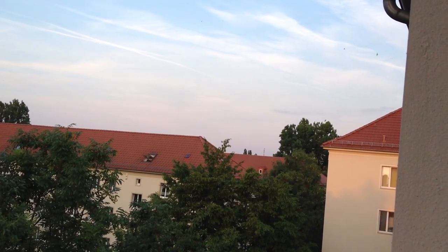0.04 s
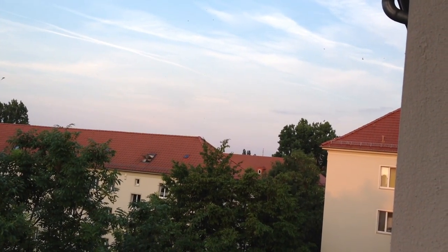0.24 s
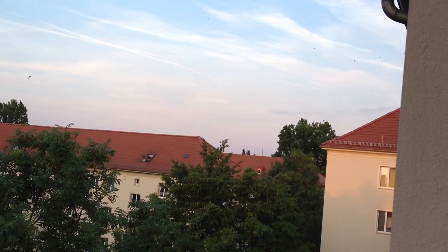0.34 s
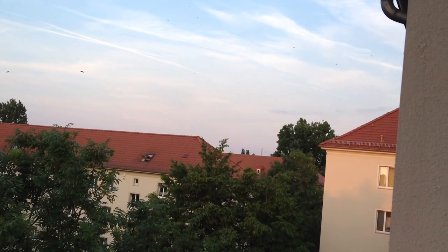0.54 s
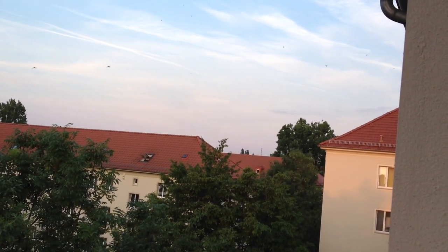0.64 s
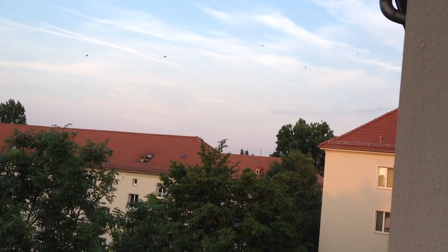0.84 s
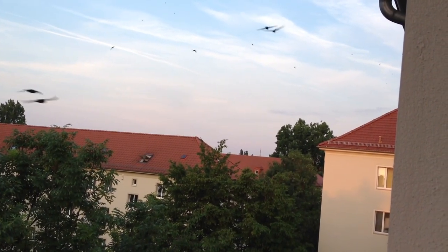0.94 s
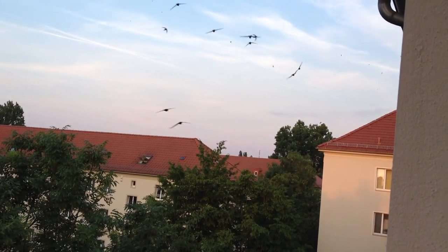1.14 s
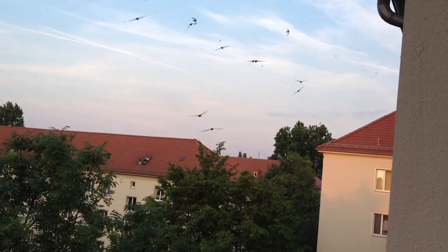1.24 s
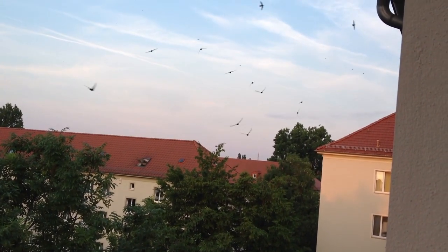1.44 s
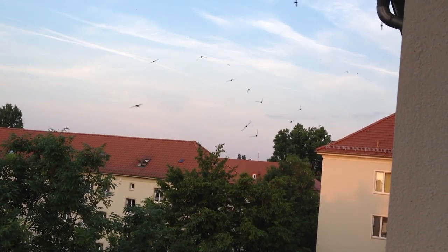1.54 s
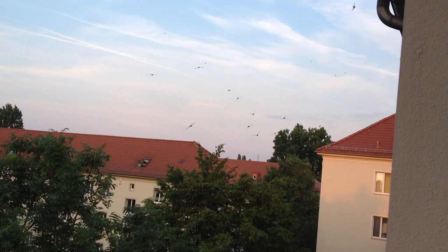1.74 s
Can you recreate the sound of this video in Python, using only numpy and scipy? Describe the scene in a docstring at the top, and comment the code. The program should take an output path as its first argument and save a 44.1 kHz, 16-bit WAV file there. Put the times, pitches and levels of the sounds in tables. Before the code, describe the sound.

Shrill overlapping screams and trills of swifts flying past between houses, then growing fainter.

```python
"""A courtyard between houses at dusk, with a party of swifts screaming overhead.
Each scream is a shrill whistle that swoops up and levels off, modulated in amplitude and frequency
about 250 times a second, which is heard as a buzz. It may end in a falling trill of chips.
Farther birds blur into a rough band, the walls reverberate, and the town hums faintly below."""
import sys
import numpy as np
from scipy import signal
from scipy.fft import rfft, irfft
from scipy.io import wavfile
from scipy.ndimage import uniform_filter1d

SR = 44100
rng = np.random.default_rng(int(sys.argv[2]) if len(sys.argv) > 2 else 0)


def store_pcm(level_fs):
    """Save levels as 16-bit WAV."""
    pcm = np.round(np.clip(level_fs, -1, 1) * 32767).astype(np.int16)
    wavfile.write(sys.argv[1], SR, np.atleast_2d(pcm).T)


N = 79380

# One contour per scream. Each row: time in seconds, pitch in Hz, level in dB.
SCREAM_CONTOURS = [
    [(0.17, 4946, -35), (0.19, 5415, -35), (0.21, 5887, -30.5), (0.268, 6010, -28), (0.286, 6060, -20),
     (0.316, 6100, -26.5), (0.325, 6204, -14.5), (.345, 6180, -25.5), (.37, 6287, -17.5), (.388, 6265, -23),
     (.413, 6340, -19), (0.452, 6400, -22), (0.514, 6310, -22), (0.62, 6115, -30)],
    [(.478, 5530, -53), (.49, 5827, -30), (.513, 6462, -29), (.53, 6910, -15), (.545, 7090, -21.5),
     (.58, 7074, -16.5), (.611, 7180, -13), (.645, 7285, -19.5), (.675, 7150, -15.5), (.72, 7160, -32),
     (.76, 6400, -61)],
    [(0.51, 5123, -21.5), (0.52, 5443, -28), (0.55, 6208, -15), (0.58, 6483, -20), (0.62, 6595, -16),
     (0.682, 6500, -25.5), (0.692, 6356, -23.5), (0.746, 6170, -26.5), (0.8, 5870, -61)],
    [(.727, 4382, -57), (.737, 4800, -31.5), (.752, 5335, -30), (.771, 5704, -19.5), (.8, 5870, -16.5),
     (.84, 5994, -20), (.875, 6100, -24), (.897, 6210, -28), (.915, 6200, -20.5), (.96, 6278, -33),
     (1.0, 6255, -37), (1.1, 6440, -43.5)],
    [(.87, 5580, -36), (.92, 5630, -41), (.97, 5354, -37), (1.0, 5350, -52), (1.085, 5800, -41),
     (1.12, 5050, -40.5), (1.165, 4936, -48)],
    [(1.122, 5100, -40), (1.15, 5363, -37.5), (1.2, 5630, -39), (1.24, 5730, -34.5), (1.28, 5760, -40),
     (1.33, 5860, -39)],
    [(1.25, 5218, -59), (1.272, 5364, -35.5), (1.314, 5740, -37), (1.39, 5926, -34.5), (1.5, 5944, -51)],
    [(1.465, 4310, -38.5), (1.478, 4510, -40.5), (1.5, 4890, -42), (1.522, 5210, -29), (1.54, 5430, -45),
     (1.575, 5596, -39.5), (1.64, 5700, -42), (1.7, 5770, -47)],
    [(1.52, 5470, -61), (1.55, 5870, -36), (1.606, 6077, -39), (1.8, 6155, -58)],
]
# One voice per scream. Each row: buzz rate in Hz, buzz depth from 0 to 1, pitch swing in Hz,
# gain of the side partials in dB, hoarseness as a factor.
SWIFT_VOICES = [(244, 0.38, 20, 6, 0.84), (257.8, 0.7, 6, 1.5, 0.5), (240.5, 0.6, 24, 4, 0.32),
                (259.4, 0.49, -120, 3.5, 0.44), (260, 0.46, 29, 0, 1), (244.6, 0.78, -50, 7.5, 0.58),
                (242, 0.3, -48, -0.8, 0.57), (247, 0.47, 34, -9, 1.5), (243, 0.5, -42, 2.8, 0.86)]


def near_swifts(fade_s=0.005):
    """Superposition: overlapping screams add, each gliding along its own pitch and level contour."""
    out = np.zeros(N)
    for contour, voice in zip(SCREAM_CONTOURS, SWIFT_VOICES):
        times, hz, db = np.transpose(contour)
        t = np.arange(times[0], times[-1] + fade_s, 1 / SR)
        fade = np.clip(np.minimum(t - times[0], t[-1] - t) / fade_s, 0, 1)
        whistle = scream(np.interp(t, times, hz), *voice)
        add(out, times[0], whistle * amp(np.interp(t, times, db)) * fade)
    return out


def scream(hz, buzz_hz, depth, swing_hz, side_db, hoarseness, jitter_rad=0.25):
    """Amplitude and frequency modulation: the buzz puts sidebands around a whistle."""
    n = len(hz)
    buzz_rate = buzz_hz * (1 + 0.03 * drift(n, rate_hz=10.5))
    buzz = np.cos(2 * np.pi * (np.cumsum(buzz_rate) / SR + rng.random()))
    waver_hz = 22 * drift(n, rate_hz=20.55)
    whistle = harmonics(hz + swing_hz * buzz + waver_hz, jitter_rad, side_db, hoarseness)
    flutter_db = 2.2 * drift(n, rate_hz=26.5)
    return whistle * (1 + depth * buzz) * amp(flutter_db)


# A swift's spectrum. Each row: multiple of the pitch, relative level in dB, weight of the rasp.
SWIFT_PARTIALS = [(.5, -45, .4), (1, 0, 0), (1.5, -22.5, 2.6), (2, -13, 1.15)]


def harmonics(hz, jitter_rad, side_db=0, hoarseness=0.32, partials=SWIFT_PARTIALS):
    """Random phase modulation broadens each partial of the voice, so the tone sounds hoarse."""
    phase = 2 * np.pi * np.cumsum(hz) / SR + jitter_rad * drift(len(hz), rate_hz=200)
    rasp = hoarseness * drift(len(hz), rate_hz=400)
    tone = np.zeros(len(hz))
    for multiple, db, rasp_weight in partials:
        top_rolloff_db = 11 * np.maximum(multiple * hz - 13300, 0) / 1e3  # overtones fade above 13.3 kHz
        peak = np.sqrt(2) * amp(db + side_db * (multiple != 1) - top_rolloff_db)
        tone += peak * np.sin(multiple * phase + rasp_weight * rasp)
    return tone


# Each row: chip length in seconds, fall within a chip in Hz, phase jitter in radians, gain of the side
# partials in dB, chips. Each chip: middle time in seconds, level in dB, middle pitch in Hz.
TRILL_RUNS = [ (0.0095, 340, 0.38, 0.9, [(0.054, -28.5, 6220), (.077, -27.5, 6020), (.098, -27, 5920),
              (.12, -26, 5770), (.143, -28, 5510), (.166, -26.5, 5580), (.188, -32, 4970),
              (.21, -41.5, 4120)]), (0.015, 1070, 1.4, -6, [(.228, -42, 4800), (.242, -35.5, 4740),
              (.33, -31.5, 5290), (.345, -38.5, 4950)]), (.008, 840, 1.13, 10, [(.604, -38, 4580),
              (.618, -28, 4950), (.634, -29.5, 4770), (.651, -26, 4650), (.668, -25, 4650),
              (.686, -30.5, 4340), (.702, -32, 4330), (.72, -35, 4200), (.738, -35, 4160)]),
              (0.013, 200, 0.67, 13.5, [(.643, -21, 5660), (.668, -28, 5470), (.697, -29.5, 5520),
              (.726, -27.5, 5250)]), (.008, 380, 0.21, 8.5, [(.791, -21, 6560), (.804, -28, 6600),
              (.816, -31, 6350), (.829, -28, 6270), (.842, -42, 6200)]),
              (0.0062, 170, 0.071, 0.5, [(1.011, -28, 5467), (1.024, -32, 5470), (1.037, -44, 5603),
              (1.05, -21, 5930), (1.063, -26, 5600), (1.076, -24, 5760), (1.089, -27, 5480)]),
              (0.011, 590, 0.96, -3, [(1.163, -41.5, 4740), (1.178, -47, 4420), (1.19, -41.5, 4740)]),
              (0.0073, 650, 1, 10, [(1.459, -47, 4140), (1.494, -49, 4202), (1.511, -44, 4300),
              (1.529, -46, 4033), (1.547, -48, 4080), (1.567, -47, 4100)]),
              (0.0072, 360, 0.35, -10, [(1.698, -37, 5580), (1.721, -39, 5400), (1.745, -40, 5200),
              (1.771, -43, 4980), (1.795, -50, 4480)]), ]


def trills():
    """Pulse trains: short falling chips in quick succession are heard as a trill."""
    out = np.zeros(N)
    for length_s, fall_hz, jitter_rad, side_db, chips in TRILL_RUNS:
        for middle_s, db, hz in chips:
            note = chip(length_s, hz + fall_hz / 2, hz - fall_hz / 2, db, jitter_rad, side_db=side_db)
            add(out, middle_s - length_s / 2, note)
    return out


def chip(length_s, start_hz, end_hz, db, jitter_rad, **timbre):
    """A linear frequency sweep under a smooth envelope makes one short note."""
    progress = np.arange(0, 1, 1 / (length_s * SR))
    envelope = amp(db) * np.sin(np.pi * progress ** 0.8) ** 2
    return envelope * harmonics(start_hz + (end_hz - start_hz) * progress, jitter_rad, **timbre)


# Each row: start and length in seconds, nominal start and end pitch in Hz, level in dB,
# phase jitter in radians.
FAINT_NOTES = [(0.135, 0.0427, 2570, 1895, -45.5, 1), (0.886, 0.059, 3100, 3155, -49.5, 0.24),
               (1.238, 0.0294, 3620, 4460, -51, 0.41)]


def faint_notes():
    """Single swept partials: two gliding chirps and a swift scream's undertone an octave below."""
    out = np.zeros(N)
    for start_s, *note in FAINT_NOTES:
        add(out, start_s, chip(*note, partials=[(0.98, 0, 0.0069)]))
    return out


# The distant swifts together. Each row: time in seconds, middle pitch in Hz, level in dB.
FLOCK_CONTOUR = [(0, 6506, -27), (0.132, 6417, -29.5), (0.222, 6150, -37.5), (.45, 6228, -20.5),
                 (0.681, 6750, -19), (.8, 6334, -25.5), (.95, 5974, -29), (1.1, 6196, -31),
                 (1.2, 6226, -42), (1.3, 5900, -41), (1.501, 5872, -38.5), (1.648, 6037, -37.5),
                 (1.8, 6000, -41)]


def far_flock(spread_hz=230):
    """Incoherent addition: four rough voices, each swelling and fading, merge into a band."""
    times, hz, db = np.transpose(FLOCK_CONTOUR)
    t = np.arange(N) / SR
    flock = np.zeros(N)
    for offset in np.linspace(-1, 1, 4):
        pitch = np.interp(t, times, hz) + spread_hz * (offset + 0.4 * drift(N, rate_hz=3.6))
        voice = scream(pitch, buzz_hz=245, depth=0.93, swing_hz=57,
                       side_db=-2, hoarseness=1.4, jitter_rad=0.4)
        flock += voice * amp(1.8 * drift(N, rate_hz=34))
    return unit_rms(flock) * amp(np.interp(t, times, db))


def wall_reverberation(sound, t60_s=0.55, level_db=-10, cutoff_hz=4900):
    """Diffuse reflections from the houses decay exponentially, duller than the direct sound."""
    t = np.arange(int(1.2 * SR)) / SR
    build_up = np.clip(t / 0.023, 0, 1)
    tail = rng.standard_normal(len(t)) * amp(-60 * t / t60_s) * build_up
    tail = signal.sosfilt(signal.butter(1, cutoff_hz, fs=SR, output="sos"), tail)
    tail /= np.sqrt(np.sum(tail ** 2))
    return amp(level_db) * signal.fftconvolve(sound, tail)[:N]


# The colour of the town's hum. Each row: frequency in Hz, relative spectral density in dB.
TOWN_SPECTRUM = [(40, -41), (145, 3), (320, -2.5), (440, -8.5), (808, -5), (1310, -6), (2380, -14),
                 (4000, -15.5), (5200, -9), (8800, -7), (15000, -34)]
# Its slow rise and fall. Each row: time in seconds, level in dB.
TOWN_LEVELS = [(0.0, -50.5), (0.57, -47), (1.8, -52)]


def town():
    """Coloured noise: distant traffic and air blend into a continuous spectrum."""
    hz = np.maximum(np.fft.rfftfreq(N, 1 / SR), 10)
    knots_hz, density_db = np.transpose(TOWN_SPECTRUM)
    colour = amp(np.interp(np.log(hz), np.log(knots_hz), density_db))
    noise = irfft(rfft(rng.standard_normal(N)) * colour, N)
    times, db = np.transpose(TOWN_LEVELS)
    return unit_rms(noise) * amp(np.interp(np.arange(N) / SR, times, db))


def drift(size, rate_hz):
    """Random fluctuation: noise low-passed twice at rate_hz, with an rms of 1."""
    pole = np.exp(-2 * np.pi * rate_hz / SR)
    settle = 8000
    smooth = signal.lfilter([1], [1, -2 * pole, pole * pole], rng.standard_normal(size + settle))
    return unit_rms(smooth[settle:])


def amp(db):
    """Amplitude ratio of a level in decibels."""
    return 10 ** (np.asarray(db) / 20)


def unit_rms(x):
    """Normalisation to an rms of 1."""
    return x / np.sqrt(np.mean(x ** 2) + 1e-20)


def add(out, start_s, sound):
    """Superposition of a delayed sound onto out."""
    i = int(start_s * SR)
    out[i:i + len(sound)] += sound[:N - i]


def scene():
    """The birds' direct sound, its reverberant field and the town add in one channel."""
    birds = near_swifts() + trills() + faint_notes() + far_flock()
    return (birds + wall_reverberation(birds) + town())[None]


def record(dry, ceiling=0.75):
    """Band limiting and compression: a small microphone loses deep bass and top; peaks are eased."""
    thin = signal.sosfilt(signal.butter(2, 60, "high", fs=SR, output="sos"), dry)
    envelope = uniform_filter1d(np.abs(signal.hilbert(thin)), size=90)
    drive = envelope / ceiling + 1e-9
    limited = thin * np.tanh(drive) / drive
    return signal.sosfilt(signal.cheby2(12, 70, 15400, fs=SR, output="sos"), limited)


dry = scene()
out = record(dry)
store_pcm(out)
```